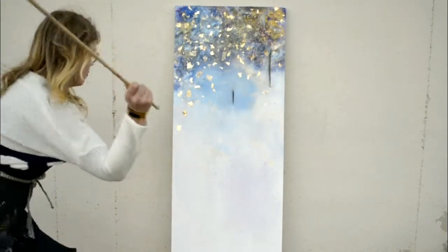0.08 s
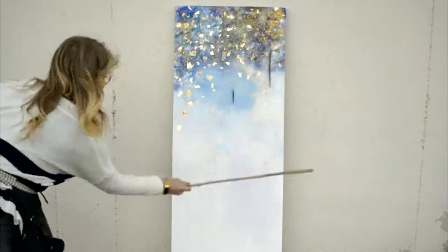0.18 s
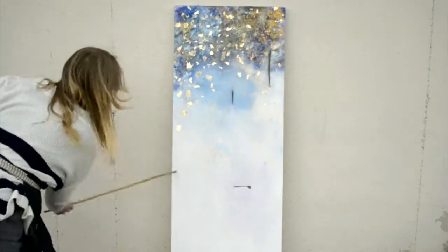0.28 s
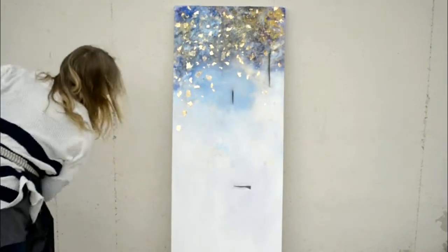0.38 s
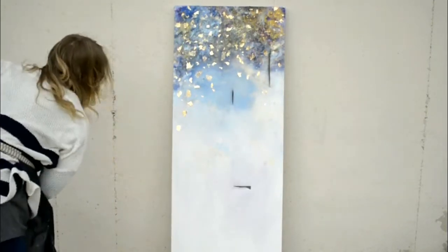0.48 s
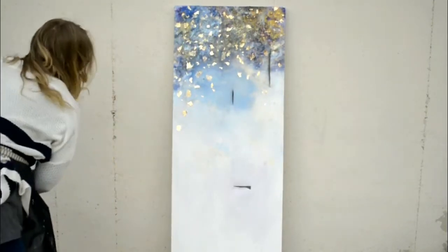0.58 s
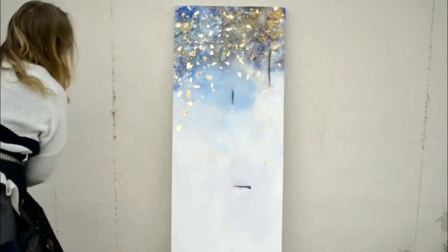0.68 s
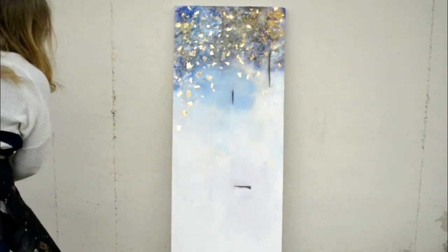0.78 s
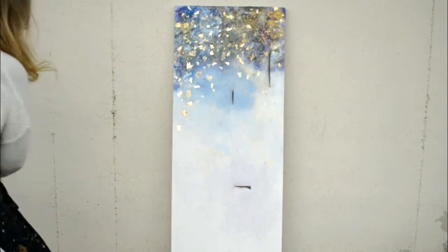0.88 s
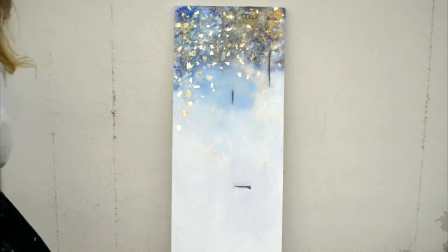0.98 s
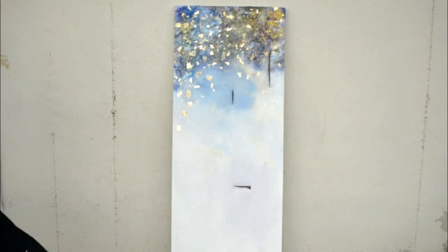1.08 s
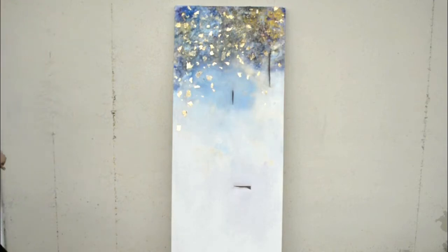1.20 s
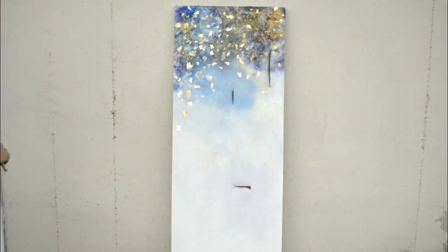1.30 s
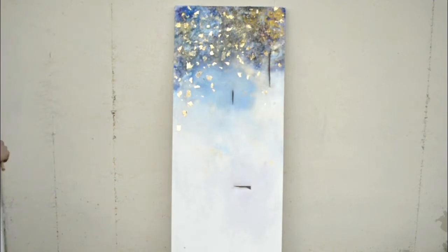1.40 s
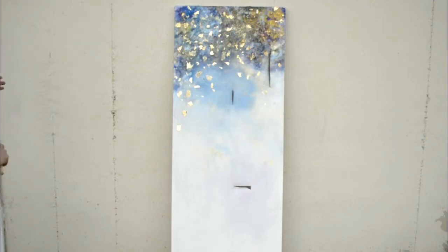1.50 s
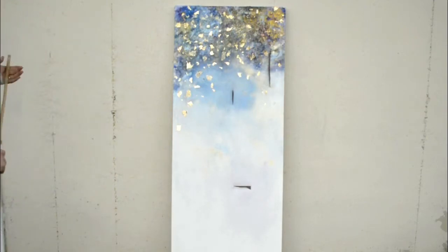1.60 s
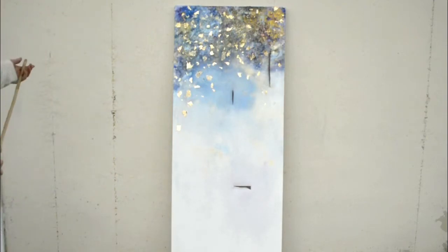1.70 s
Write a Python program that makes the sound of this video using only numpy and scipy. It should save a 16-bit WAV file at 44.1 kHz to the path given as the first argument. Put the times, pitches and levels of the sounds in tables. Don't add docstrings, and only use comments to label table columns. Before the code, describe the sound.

One hard, dry stick crack on a hollow-sounding panel, preceded by a quick rising whoosh and followed by a weak slap back, brief room reflections, soft cloth rustling and a gritty foot scrape, above quiet steady machine hum.

```python
import sys
import numpy as np
from scipy import signal
from scipy.fft import rfft, irfft, next_fast_len
from scipy.io import wavfile
from scipy.ndimage import map_coordinates

SR = 44100
rng = np.random.default_rng(int(sys.argv[2]) if len(sys.argv) > 2 else 0)


def to_wav(sig):
    pcm = np.clip(np.atleast_2d(sig), -1, 1) * 32767
    pcm = np.round(pcm).astype(np.int16)
    wavfile.write(sys.argv[1], SR, pcm.T)


def boost(x):
    u = np.asarray(x, float) / 20
    return 10 ** u


N = 74970


def unit(x):
    return x / np.sqrt(np.mean(x ** 2) + 1e-20)


def along(points, hz):
    point_hz, value = np.transpose(points)
    return np.interp(np.log(hz + 1), np.log(point_hz + 1), value)


def wobble(rate):
    knots = rng.standard_normal(int(N * rate / SR) + 4)
    return map_coordinates(knots, [np.arange(N) * rate / SR])


def filtered(x, response):
    size = next_fast_len(len(x) + SR // 2)
    hz = np.fft.rfftfreq(size, 1 / SR)
    return irfft(rfft(x, size) * response(hz), size)[:len(x)]


def noise(spectrum, size):
    return unit(filtered(rng.standard_normal(size), lambda hz: boost(along(spectrum, hz))))


def add(x, start_s, part):
    first = round(start_s * SR)
    x[first:][:len(part)] += part[:len(x) - first]


def ring(modes, t):
    return sum(boost(db - 60 * t / t60) * np.sin(2 * np.pi * hz * t) for hz, db, t60 in modes)


def snaps(rows, q=1.3):
    t, out = np.arange(SR // 10) / SR, np.zeros(N)
    for start_s, peak_db, pitch_hz, t60_s in rows:
        click = 3 * (t == 0)
        burst = (rng.standard_normal(len(t)) + click) * boost(-60 * t / t60_s)

        def resonance(f):
            spread = 1j * f * pitch_hz / q
            return (spread / (pitch_hz ** 2 - f * f + spread)) ** 2

        burst = filtered(burst, resonance)
        add(out, start_s, boost(peak_db) * burst / np.abs(burst).max())
    return out


def machine():
    # order, level_db [dB rms]
    shaft_orders = [(1, -55.5), (2, -62.5), (3, -66.5), (4, -84), (5, -81.5), (6, -85)]
    # pitch_hz [Hz], level_db [dB]
    room_hiss = [(210, -33), (350, -9.5), (664, -10), (1180, -11.5), (1630, -14), (1760, -16),
                 (16000, -41.5)]
    # pitch_hz [Hz], level_db [dB]
    low_rumble = [(25, -4), (60, 0), (130, 0.5), (250, -8), (500, -16)]
    shaft_hz, mains_hz = 92.47, 114
    turn = 2 * np.pi * np.cumsum(shaft_hz * (1 + 0.0022 * wobble(23))) / SR
    hum = np.zeros(N)
    for order, level_db in shaft_orders:
        sway_db = 1.57 * wobble(26)
        hum += boost(level_db + 2 + sway_db) * np.sin(order * turn + rng.uniform(0, 7.7))
    mains = boost(-66.5) * np.sin(2 * np.pi * mains_hz * np.arange(N) / SR)
    hiss = boost(-68) * noise(room_hiss, N)
    rumble = boost(-67) * noise(low_rumble + [(900, -57.0)], N)
    return hum + mains + hiss + rumble


def clothes():
    # start_s [s], length_s [s], level_db [dB], rise_s [s], fall_s [s]
    rustles = [(0.008, 0.11, -66, 0.024, 0.13), (.318, 0.011, -60.5, 0.0046, .02),
               (0.384, 0.024, -67, 0.0077, 0.068), (0.468, 0.069, -74.5, 0.019, 0.0226),
               (0.524, 0.084, -71, 0.026, 0.013), (0.657, 0.0673, -78.5, 0.014, 0.0295),
               (0.732, 0.057, -69.5, 0.0075, 0.0713), (0.856, 0.152, -78, 0.0096, 0.0246),
               (1.064, 0.096, -63, 0.051, 0.0153), (1.319, 0.028, -74.5, 0.0094, 0.029),
               (1.46, .04, -83.5, 0.01204, 0.035)]
    # pitch_hz [Hz], level_db [dB]
    cloth_colour = [(880, -33.5), (1500, 0.5), (2300, -1.5), (2690, -2.5), (3550, -6), (8490, 0.5),
                    (16000, -19)]
    # start_s [s], peak_db [dB], pitch_hz [Hz], t60_s [s]
    fold_ticks = [(.5303, -49, 900, 0.012), (.531, -56, 5300, 0.024), (0.5662, -54, 4130, 0.0249),
                  (.588, -54, 4300, 0.0252), (.7393, -48.5, 7130, 0.0315), (0.761, -58, 7490, .02),
                  (.770, -74.5, 8770, 0.018), (0.7908, -48, 8180, .01), (0.7912, -47.5, 2020, 0.011),
                  (.796, -51, 3100, 0.022), (.879, -56, 6850, .03), (.8985, -67, 8900, 0.017),
                  (0.937, -57, 8600, .03), (0.969, -57, 7600, 0.017), (.995, -57.5, 6395, .015),
                  (1.016, -66, 11700, .015), (1.178, -61, 8912, 0.0089), (1.3275, -58, 6873, 0.023),
                  (1.4982, -57, 6387, .01), (1.683, -61, 2460, .03)]
    # start_s [s], peak_db [dB], pitch_hz [Hz], t60_s [s]
    heel_knocks = [(0.414, -50.5, 177, 0.29), (.528, -53, 590, 0.11), (1.088, -54.5, 260.4, .1),
                   (1.12, -60.5, 459, 0.09), (1.387, -46.5, 614, 0.096), (0.2953, -38, 9026, .02),
                   (1.4088, -43, 1530, 0.012)]
    t, shape = np.arange(N) / SR, np.zeros(N)
    for start_s, length_s, level_db, rise_s, fall_s in rustles:
        rising = (t - start_s) / rise_s
        falling = (start_s + length_s + fall_s - t) / fall_s
        shape += boost(level_db) * np.clip(np.minimum(rising, falling), 0, 1)
    grains = unit(noise(cloth_colour, N) * boost(1.8 * wobble(360)))
    return shape * grains + snaps(fold_ticks + heel_knocks)


def swish():
    # start_s [s], whistle pitch_hz [Hz], level_db [dB]
    swing = [(0.171, 300, -74), (0.199, 364, -56), (0.208, 440, -41.5), (0.224, 582, -41),
             (0.227, 600, -44.5), (0.2305, 710, -48.5)]
    # pitch_hz [Hz], level_db [dB]
    air_colour = [(300, -17), (1200, -1.5), (3000, -8), (9000, -19.5), (16000, -31.5)]
    start_s, pitch_hz, level_db = np.transpose(swing)
    t = np.arange(N) / SR
    pitch = np.interp(t, start_s, pitch_hz) * (1 + 0.029 * wobble(120))
    roughness = boost(1.1 * np.tanh(wobble(60)))
    whistle = np.sin(2 * np.pi * np.cumsum(pitch) / SR) * roughness
    whistle *= boost(np.interp(t, start_s, level_db, -140, -140))
    rise = np.clip((t - 0.19) / 0.032, 0, 1) ** 2
    fall = np.clip(1 - (t - 0.25) / 0.0062, 0.08, 1)
    before_blow = t < start_s[-1]
    return whistle + boost(-48.5) * rise * fall * before_blow * noise(air_colour, N)


def stick():
    # start_s [s], level_db [dB], contact_ms [ms], crack_db
    # [dB], direction [1 push, -1 pull]
    pulses = [(0.2326, 1.5, .46, -18, 0.9), (0.2343, -4, 0.43, -17.5, 1), (0.2354, -16, 1.48, -34, 1),
              (0.2371, -20, 0.44, -34.5, -1), (0.2425, -21.5, 0.79, -36.5, -1),
              (0.2428, -10, 0.61, -29, 1), (0.244, -16.5, 0.5, -35, -1), (0.2528, -18.5, 0.61, -37, -1),
              (0.255, -14.5, 2.27, -45, -1), (0.2967, -18, 1.2, -31, -1), (0.3, -28, 0.6, -34, -1),
              (0.31, -35.5, 0.52, -62, -1), (0.324, -33.5, 1.14, -61, 0.89),
              (.3280, -30, 0.72, -62, -0.7)]
    # pitch_hz [Hz], level_db [dB]
    crack_colour = [(800, -11.5), (3000, -11.5), (8500, 7.5), (11000, -3), (16000, -22)]
    # pitch_hz [Hz], level_db [dB], t60_s [s]
    panel_tones = [(175, -10, 0.056), (225, -17.5, 0.088), (443.5, -18.5, 0.061), (512, -17, .03),
                   (680, -17.5, 0.06), (861, -17, 0.078), (1054, -19.5, 0.056), (1140, -19, .05),
                   (1330, -23.5, 0.013), (1514, -22, 0.026), (1750, -24.5, 0.075), (1907.4, -16.5, .05),
                   (2120, -16.5, 0.045), (2360, -19.5, 0.04)]
    # pitch_hz [Hz], level_db [dB]
    crowd_colour = [(200, -25), (600, -3.5), (1200, -1.5), (2200, -11), (3200, -15.5), (6000, -19.5),
                    (12000, -34)]
    # pitch_hz [Hz], level_db [dB], t60_s [s]
    tip_snap = [(4200, -3, .0018), (6000, -2, .0018), (8700, 0, .0026), (11700, -18, .003)]
    # pitch_hz [Hz], level_db [dB], t60_s [s]
    tip_tones = [(1160, 0, 0.011), (2360, -4.5, 0.0068), (3330, 2.5, 0.0036), (4300, -11, 0.0073),
                 (5330, -3.5, 0.007), (6600, 2, 0.0065), (7380, -6, 0.009), (8200, -13, 0.011)]
    blows, panel, t = np.zeros(N), np.zeros(N), np.arange(SR // 4) / SR
    swell = 1 - np.exp(-t / 0.001)
    release = 0.72
    for start_s, level_db, contact_ms, crack_db, direction in pulses:
        progress = np.clip(t * 1000 / contact_ms, 0, 1)
        press = np.minimum(progress / release, (1 - progress) / (1 - release))
        push = np.sign(direction) * np.sin(np.pi / 2 * press) ** 2
        fall = boost(-60 * t / 0.0035) + boost(-14.5 - 60 * t / 0.07)
        crack = boost(crack_db) * noise(crack_colour, len(t)) * fall * progress
        add(blows, start_s, boost(level_db) * push + crack)
        crowd = boost(-19.5 - 60 * t / 0.079) * noise(crowd_colour, len(t)) * swell
        even_push = push / np.abs(push).sum()
        tones = signal.fftconvolve(even_push, swell * ring(panel_tones, t))[:len(t)]
        add(panel, start_s, boost(level_db) * (crowd - tones))
    snap_s = pulses[0][0] + 0.85 * pulses[0][2] / 1000
    add(panel, snap_s, -boost(-5) * ring(tip_snap, t))
    rattle_rise = (1 - np.exp(-t / 0.00064)) ** 2
    add(panel, 0.2964, boost(-15) * ring(tip_tones, t) * rattle_rise)
    edge_hz = 65
    return [filtered(x, lambda f: (1j * f / (edge_hz + 1j * f)) ** 3) for x in (blows, panel)]


def studio(x):
    # pitch_hz [Hz], t60_s [s]
    echo_length = [(150, 0.7), (400, 0.45), (1200, 0.73), (2200, 0.68), (3200, 0.64), (8000, 0.5),
                   (14000, 0.3)]
    # pitch_hz [Hz], level_db [dB]
    echo_colour = [(100, 1.5), (400, 5), (1000, -1), (1900, 4.5), (3500, 4), (12000, -2)]
    hz, t, cells = signal.stft(rng.standard_normal(SR), SR, nperseg=256)
    colour_db = along(echo_colour, hz)[:, None]
    decay_db = 60 * t / along(echo_length, hz)[:, None]
    tail = signal.istft(cells * boost(colour_db - decay_db), SR, nperseg=256)[1]
    gap_s = 0.0054
    tail = tail * np.clip(np.arange(len(tail)) / SR / gap_s, 0, 1) ** 2
    return signal.fftconvolve(x, tail / np.linalg.norm(tail))[:N]


def far_walls():
    # start_s [s], peak_db [dB], pitch_hz [Hz], t60_s [s]
    reflections = [(.272, -35, 2000, 0.017), (.2805, -29.5, 2109, 0.024), (.322, -34.5, 1020, 0.013),
                   (.326, -44, 199, 0.09), (.340, -36.5, 1960, .015), (.347, -35.5, 1630, .02),
                   (.351, -40, 1620, 0.044), (.386, -39.5, 1750, .02)]
    return snaps(reflections, q=3)


def shoe():
    # start_s [s], level_db [dB]
    slide = [(1.3838, -52), (1.389, -51.5), (1.394, -47), (1.411, -47.5), (1.423, -52.5), (1.432, -58.5),
             (1.45, -65), (1.481, -80.5)]
    # start_s [s], peak_db [dB], pitch_hz [Hz], t60_s [s]
    grit_snaps = [(1.3925, -43, 2320, 0.0148), (1.398, -36, 8010, 0.00863), (1.4003, -38, 3002, 0.0089),
                  (1.4052, -39.5, 3100, .008), (1.4115, -50, 7500, 0.0092), (1.412, -41.5, 3120, .01),
                  (1.416, -42, 2210, .012), (1.4165, -47, 8200, .01), (1.4275, -39, 7100, 0.0065),
                  (1.4288, -40.5, 1246, 0.014), (1.429, -41.5, 8400, .01), (1.4345, -39.5, 7030, 0.009),
                  (1.4355, -41, 2440, 0.014), (1.4362, -45, 902, 0.013), (1.4385, -42, 8420, 0.0044),
                  (1.4452, -48, 8050, .004), (1.4453, -44.5, 3490, 0.0053)]
    # pitch_hz [Hz], level_db [dB]
    sole_colour = [(210, -40.5), (350, -10), (791, -7.5), (871, -2), (1070, -12.5), (2240, -3), (4310, -12),
                   (8170, -6), (16000, -27)]
    start_s, level_db = np.transpose(slide)
    slide_db = np.interp(np.arange(N) / SR, start_s, level_db, -140, -140)
    grain_db = 2.5 * wobble(1800) - 1.25
    return boost(slide_db + grain_db) * noise(sole_colour, N) + snaps(grit_snaps)


def scene():
    background = machine()
    small = clothes() + swish() + shoe()
    blows, panel = stick()
    into_room = blows + boost(-14) * panel + boost(-5) * small
    room = boost(-19) * studio(into_room) + far_walls()
    return (blows + panel + small + room + background)[None]


def roll_off(x):
    return signal.sosfilt(signal.butter(12, 16570, fs=SR, output="sos"), x)


def record(dry):
    low_cut_hz, top_hz, clip_level = 50, 15800, 1.02
    x = filtered(dry[0], lambda f: (1j * f / (low_cut_hz + 1j * f)) ** 2)
    x = x / (1 + np.abs(x / clip_level) ** 8) ** (1 / 8)
    x = filtered(x, lambda f: 1 / (1 + (f / top_hz) ** 20))
    return roll_off(x[None])


dry = scene()
out = record(dry)
to_wav(out)
```